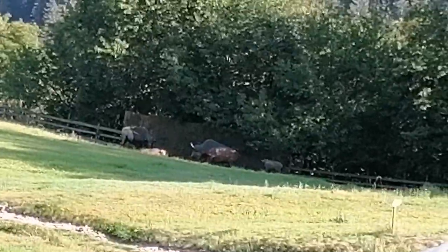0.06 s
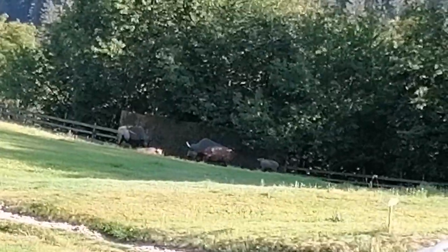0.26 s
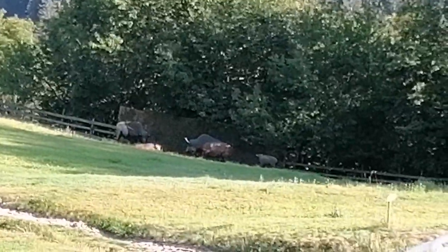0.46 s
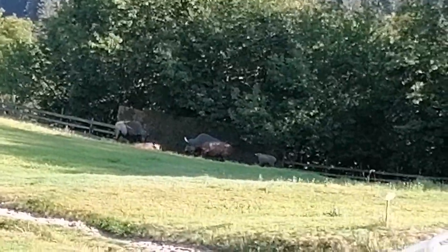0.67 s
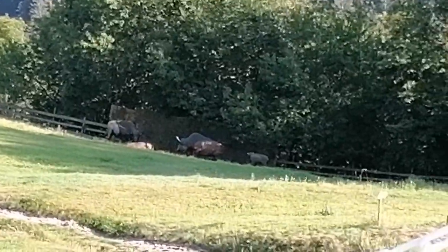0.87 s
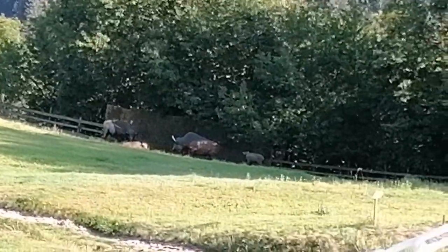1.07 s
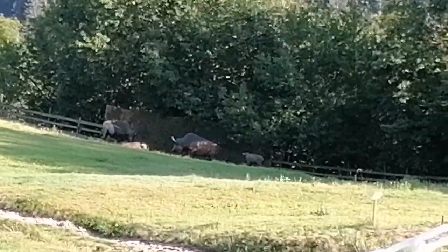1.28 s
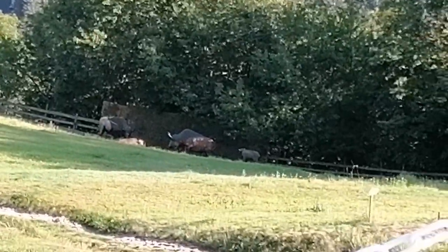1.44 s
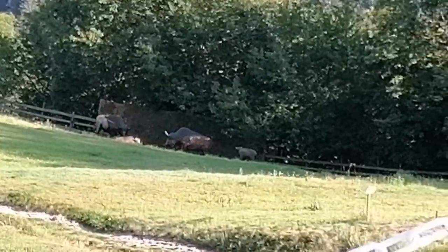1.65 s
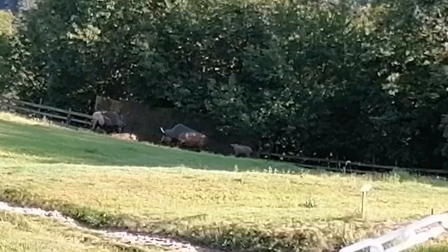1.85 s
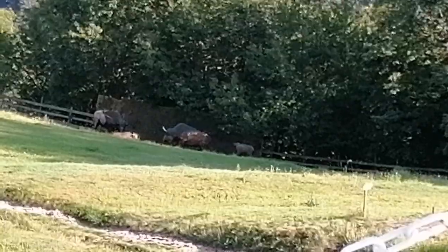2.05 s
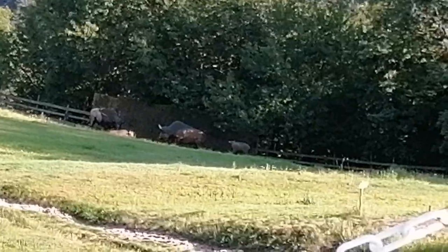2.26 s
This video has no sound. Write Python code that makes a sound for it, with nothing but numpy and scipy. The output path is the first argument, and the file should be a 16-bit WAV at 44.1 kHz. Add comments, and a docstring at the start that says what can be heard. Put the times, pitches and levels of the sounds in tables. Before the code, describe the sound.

Quiet outdoor air with soft hiss and faint low wind rumble on the microphone; a barely audible tick at 1.3 s. At about 1.36 s a bow is shot close up: brief rustle, low push, hard bright slap and rattling knocks within 0.05 s. A low string ring dies over half a second, with a faint scattered tree echo from 1.6 s. At 2.06 s the arrow lands, tiny and distant; slightly stronger wind ends it.

```python
"""A bow is shot on a meadow, close up: the string's low push of air, a slap and rattle of fittings, then a low ring.
Push is a short pulse; string, limbs and fittings are dying sines; string and arrow rustle as shaped noise.
Trees answer a moment later as a scattered noise tail, and the arrow lands far off as a short cluster of rings.
Light wind rumbles on the microphone in noise of drifting level, over a soft hiss."""
import sys
import numpy as np
from scipy import signal
from scipy.fft import rfft, irfft, next_fast_len
from scipy.io import wavfile
from scipy.ndimage import map_coordinates

SR = 44100
rng = np.random.default_rng(int(sys.argv[2]) if len(sys.argv) > 2 else 0)


def unload_wav(signal):
    """Save mono or channel-first audio to the path in sys.argv[1] as 16-bit WAV at rate SR, clipped to [-1, 1]."""
    wavfile.write(
        sys.argv[1],
        SR,
        np.round(np.clip(np.atleast_2d(signal).T, -1, 1) * 32767).astype(np.int16),
    )


N = 102179
T = np.arange(N) / SR  # time [s]

# String's low push of air: centre and width [s], peak [dB]
PUSH_S, PUSH_WIDTH_S, PUSH_DB = 1.3569, 0.00099, -23.5
# String and limbs ringing: (frequency [Hz], starting level [dB], decay by 60 dB [s])
STRING_PARTIALS = [(118, -46.5, 1.0), (236, -37, .43), (354, -44, .4), (378, -62, 1.3), (472, -47, .4),
                   (295, -44, .2), (540, -48, .4), (630, -48, .3), (745, -48, .3)]
# The partials start [s] flat by this share of their pitch, then settle with this time constant [s]
STRING_S, FLAT_SHARE, SETTLE_S = 1.358, .125, .06
# Steady hum of the limbs: frequency [Hz], starting level [dB], decay by 60 dB [s]
LIMBS_HZ, LIMBS_DB, LIMBS_T60 = 93.5, -49, 1.2
# Limbs stopping: (frequency [Hz], level [dB], decay by 60 dB [s])
THUD_MODES = [(70, -39, .1)]

# Knocks inside the bow: (time [s], bright ring [dB], middle knock [dB], treble tick [dB])
KNOCKS_IN_BOW = [(1.3411, -46.5, -35.5, -47), (1.3463, -50.5, -37.5, -51.5), (1.3528, -38, -43, -46.5),
                 (1.362, -41, -41, -41.5), (1.3646, -18, -32, -40), (1.36622, -22, -43, -38),
                 (1.36881, -24, -36, -40), (1.37141, -25, -36, -28), (1.3738, -26.5, -31, -36.5),
                 (1.3761, -41.5, -41.5, -33.5), (1.3790, -36, -43, -47), (1.3840, -25, -36.5, -54),
                 (1.3885, -30, -32.5, -49.5), (1.394, -36, -36, -46.5), (1.3969, -31.5, -39.5, -45),
                 (1.4045, -41.5, -39, -53), (1.4078, -47.5, -34.5, -56)]
# What the fittings ring with: (frequency [Hz], level relative to the knock [dB], decay by 60 dB [s])
BRIGHT_MODES = [(2445, -9.5, .04), (2795, -8.5, .03), (3085, -1.5, .02)]
MIDDLE_MODES = [(512, -7.5, 0.061), (625, -13, 0.034), (1120, -7.5, 0.042), (1427, -5.5, 0.039),
                (1950, -8, 0.034)]
TREBLE_MODES = [(5400, -5, .018), (6050, -1, .012), (6550, -2, .012), (7060, -4, .012)]
# Longer ring after the main slap: (frequency [Hz], level [dB], decay by 60 dB [s])
LINGER_MODES = [(1060, -47, .25), (1390, -48, .25), (1800, -54, .25), (2160, -54, .22), (2480, -47, .24),
                (5580, -58, .3), (7010, -57, .3)]
SLAP_S = 1.3646
ATTACK_S = 0.00035  # time constant of a ring's rise

# Rustle of string and arrow, before its flicker: (time [s], level [dB])
RUSTLE_LEVEL = [(1.33, -71), (1.339, -58), (1.342, -43), (1.35, -44.5), (1.356, -40), (1.366, -29.5),
                (1.377, -31), (1.382, -38), (1.396, -38), (1.412, -43), (1.43, -49), (1.51, -63.5),
                (1.54, -67), (1.62, -81)]
# Rustle's colour, first bright then dull: (frequency [Hz], relative level per Hz [dB])
RUSTLE_BRIGHT = [(120, -20), (200, -6), (650, -3), (880, -8.5), (1170, -4), (1800, -6), (3000, -4),
                 (3400, -15.5), (4700, -18.5), (7000, -17.5), (8000, -27)]
RUSTLE_DULL = [(120, -16), (350, -1.5), (750, -8), (1100, -10), (1900, -19), (2480, -13), (3300, -20.5),
               (4600, -30.5), (5600, -26), (7000, -28.5), (8000, -37)]
DULLS_S, DULLS_OVER_S = 1.385, .04  # start and length of the dulling

# Small ticks near the archer: (time [s], level [dB], frequency [Hz], decay by 60 dB [s])
SMALL_TICKS = [(1.3006, -61, 1900, .012), (1.3006, -66, 3900, .01), (1.5180, -50.5, 4300, .008)]
# Far target: (frequency [Hz], level relative to the landing [dB], decay by 60 dB [s])
TARGET_MODES = [(420, -6, .03), (1450, -9, .03), (2400, 1, .01), (2800, -3, .008)]
LAND_S, LAND_DB = 2.0622, -55

# Colour of the tree answer: (frequency [Hz], gain [dB])
TREES_COLOUR = [(300, -20), (1500, -13.5), (2200, 1), (3000, 0.5), (3600, 1), (5000, -4), (8000, -5)]
# Answer's delay [s], gain before colouring [dB], decay by 60 dB [s]
TREES_S, TREES_DB, TREES_T60 = .221, -33.5, 1
RING_SENT_DB = -9  # the ring reaches the trees this much weaker than the rustle

# Wind rumble, before its lift: (time [s], level [dB])
WIND_LEVEL = [(0.0, -73.5), (0.4, -67.5), (0.5, -69.5), (0.82, -72.5), (0.94, -72.5), (1.01, -72),
              (1.18, -76), (1.29, -71.5), (1.43, -70), (1.49, -61), (1.84, -72), (2.1, -72), (2.23, -68),
              (2.31, -62.5)]
WIND_LIFT_DB = 2.5
# Colour of the rumble: (frequency [Hz], relative level per Hz [dB])
RUMBLE_COLOUR = [(8.8, -31.5), (15, -2.5), (65, -0.5), (82, -5), (102, -13.5), (140, -13), (200, -26.5),
                 (260, -45.5), (440, -120)]
# Colour of the hiss: (frequency [Hz], relative level per Hz [dB])
HISS_COLOUR = [(76, -32), (130, -7), (245, -1), (327, -8), (626, -6), (851, -10.5), (992, -10.5),
               (6380, -23), (7070, -23), (7700, -32.5), (10000, -55), (16900, -120)]
# Slow drift around the hiss's base level: (time [s], offset [dB])
HISS_OFFSET = [(0, -0.5), (.5, 0.5), (1.2, -0.5), (1.8, -0.5), (2.32, -2.5)]
HISS_BASE_DB = -73.5

FLOOR_DB = -100  # faint noise under all
TOP_HZ = 7900  # nothing of the scene passes above this


def amp(db):
    """Decibels to linear gain."""
    return 10 ** (np.asarray(db) / 20)


def unit(x):
    """Scale to an RMS of one."""
    return x / np.sqrt(np.mean(x ** 2) + 1e-20)


def filtered(x, response):
    """Multiply the spectrum by a zero-phase response of frequency."""
    size = next_fast_len(N + SR // 2)
    hz = np.fft.rfftfreq(size, 1 / SR)
    return irfft(rfft(x, size) * response(hz), size)[:N]


def coloured(x, points):
    """Equalise through (frequency [Hz], gain [dB]) points on a log axis."""
    point_hz, db = np.transpose(points)
    return filtered(x, lambda hz: amp(np.interp(np.log(hz + 1), np.log(point_hz + 1), db)))


def noise(points):
    """Coloured noise with an RMS of one."""
    return unit(coloured(rng.standard_normal(N), points))


def wobble(rate):
    """A smooth random curve, rate knots a second."""
    knots = rng.standard_normal(int(N * rate / SR) + 4)
    return map_coordinates(knots, [T * rate])


def ring(start_s, db, modes, scatter_db):
    """A strike sets modes dying away together, each at a slightly random level, for at most a third of a second."""
    out = np.zeros(N)
    first = int(start_s * SR) + 1
    t = T[first:first + SR // 3] - start_s
    scatter = scatter_db * rng.standard_normal(len(modes))
    body = np.zeros(len(t))
    for (hz, level, t60), change in zip(modes, scatter):
        body += amp(db + level + change - 60 * t / t60) * np.sin(2 * np.pi * hz * t)
    out[first:first + len(t)] = (1 - np.exp(-t / ATTACK_S)) * body
    return out


def string():
    """One low push sets the limbs humming; the string's partials rise to pitch as the swing shrinks."""
    u = (T - PUSH_S) / PUSH_WIDTH_S
    push = -amp(PUSH_DB) * (1 - 0.86 * u ** 2) * np.exp(-u ** 2 / 2)

    since_push = np.clip(T - PUSH_S, 0, None)
    limbs = amp(LIMBS_DB - 60 * since_push / LIMBS_T60) * np.sin(2 * np.pi * LIMBS_HZ * since_push)
    thud = ring(PUSH_S, 0, THUD_MODES, scatter_db=0)

    t = np.clip(T - STRING_S, 0, None)
    # a clock that runs slow at first starts every partial flat
    clock = t - FLAT_SHARE * SETTLE_S * (1 - np.exp(-t / SETTLE_S))
    partials = sum(amp(db - 60 * t / t60) * np.sin(2 * np.pi * hz * clock)
                   for hz, db, t60 in STRING_PARTIALS)
    return push + limbs + thud + partials


def fittings():
    """Every knock rings three groups of modes; the main slap leaves a longer, flickering ring."""
    knocks = np.zeros(N)
    for s, bright_db, middle_db, treble_db in KNOCKS_IN_BOW:
        knocks += ring(s, bright_db, BRIGHT_MODES, scatter_db=1.5)
        knocks += ring(s, middle_db, MIDDLE_MODES, scatter_db=2.5)
        knocks += ring(s, treble_db, TREBLE_MODES, scatter_db=2.5)
    flicker = amp(3 * wobble(60))
    return knocks + flicker * ring(SLAP_S, 0, LINGER_MODES, scatter_db=1.5)


def rustle():
    """String and arrow rustle: grainy noise that crossfades from bright to dull as it dies."""
    s, db = np.transpose(RUSTLE_LEVEL)
    late = np.clip((T - DULLS_S) / DULLS_OVER_S, 0, 1)
    mix = np.sqrt(1 - late) * noise(RUSTLE_BRIGHT) + np.sqrt(late) * noise(RUSTLE_DULL)
    level_db = np.interp(T, s, db, left=-120, right=-120)
    return amp(level_db + 2.2 * wobble(300)) * mix


def small_ticks():
    """Ticks near the archer, each a single short dying sine."""
    return sum(ring(s, db, [(hz, 0, t60)], scatter_db=0) for s, db, hz, t60 in SMALL_TICKS)


def arrow_landing():
    """The arrow strikes the far target and rings its modes, with polarity flipped."""
    return -ring(LAND_S, LAND_DB, TARGET_MODES, scatter_db=1)


def trees(sent):
    """The tree line scatters the sound back late, as a dying noise tail."""
    t = T - TREES_S
    tail = (t > 0) * amp(-60 * t / TREES_T60) * rng.standard_normal(N)
    answer = signal.fftconvolve(sent, tail / np.linalg.norm(tail))[:N]
    return amp(TREES_DB) * coloured(answer, TREES_COLOUR)


def wind():
    """Lumpy low noise: wind rumbling on the microphone."""
    s, db = np.transpose(WIND_LEVEL)
    # the closing point holds everything above 400 Hz at -59 dB
    rumble = noise(RUMBLE_COLOUR + [(400, -59)])
    lumps = unit(amp(0.94 * wobble(36)) * rumble)
    return amp(np.interp(T, s, db) + WIND_LIFT_DB) * lumps


def hiss():
    """A soft bed of coloured noise, its level drifting slightly."""
    s, offset_db = np.transpose(HISS_OFFSET)
    level_db = HISS_BASE_DB + np.interp(T, s, offset_db) + 0.47 * wobble(6)
    return amp(level_db) * noise([(60, -28)] + HISS_COLOUR)


def scene():
    """Mix the bow, its answer from the trees, the small sounds and the air."""
    knocks, swish = fittings(), rustle()
    answer = trees(swish + amp(RING_SENT_DB) * knocks)
    bow = string() + knocks + swish
    small_sounds = small_ticks() + arrow_landing()
    return (bow + small_sounds + answer + wind() + hiss())[None]


def record(dry):
    """The microphone rolls off steeply near its band limit; a faint noise lies under all."""
    cut = filtered(dry[0], lambda hz: (hz < TOP_HZ) / (1 + (hz / 7500) ** 50))
    return (cut + amp(FLOOR_DB) * rng.standard_normal(N))[None]


dry = scene()
out = record(dry)
unload_wav(out)
```